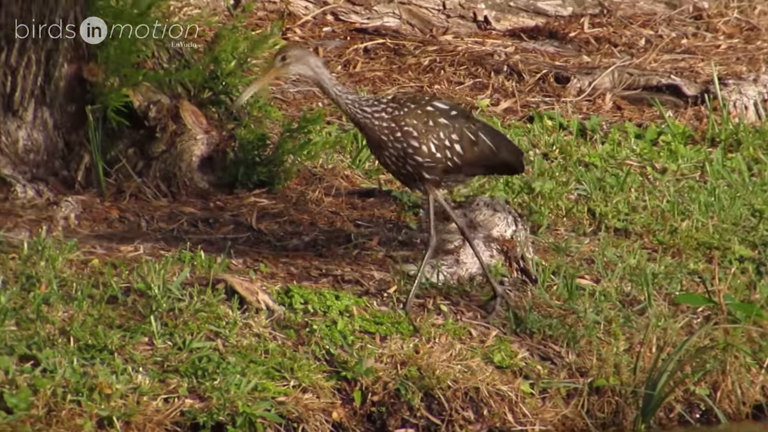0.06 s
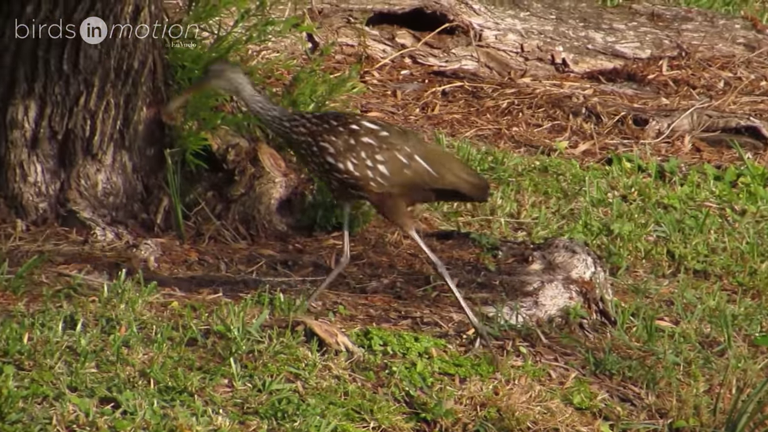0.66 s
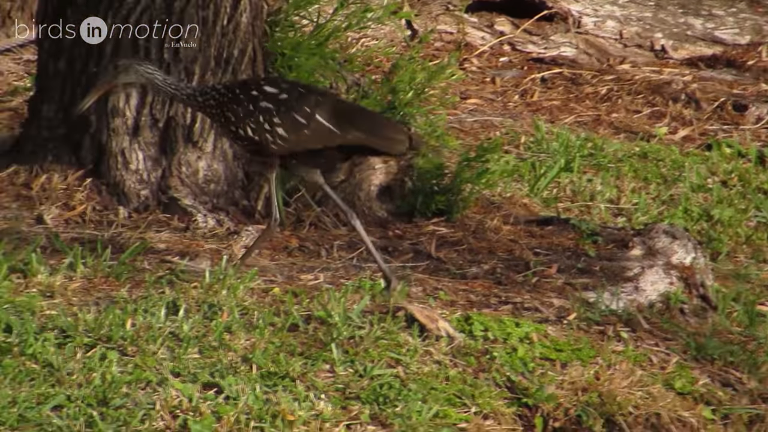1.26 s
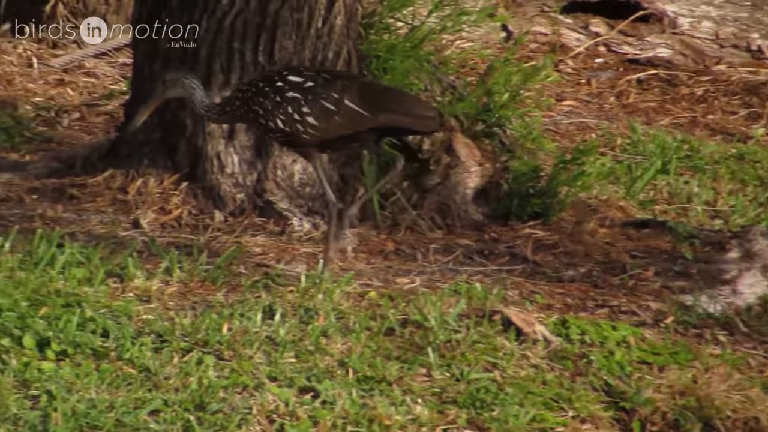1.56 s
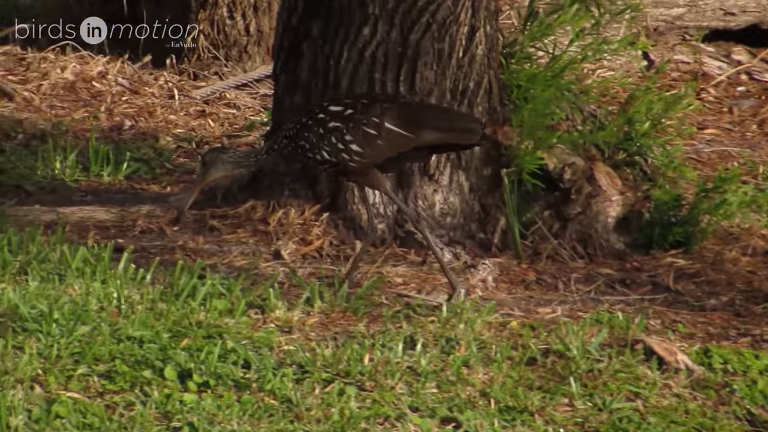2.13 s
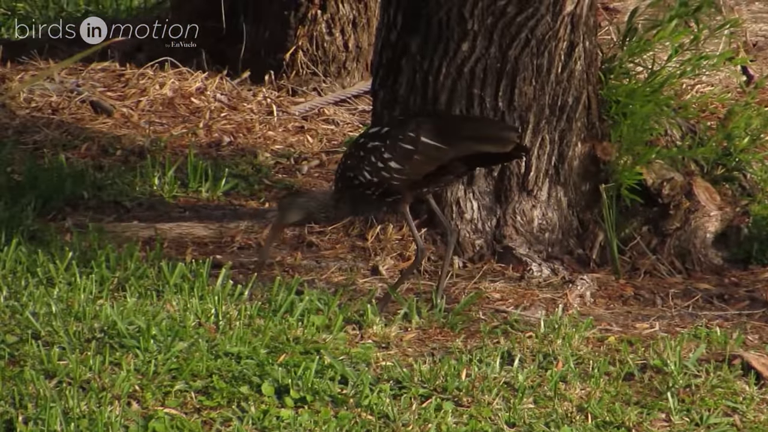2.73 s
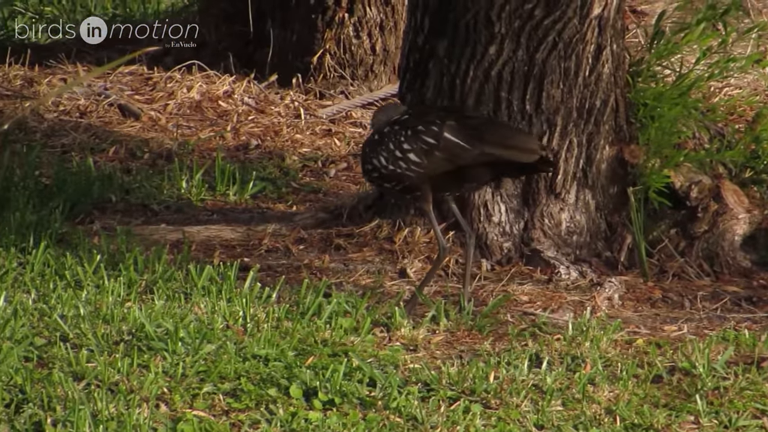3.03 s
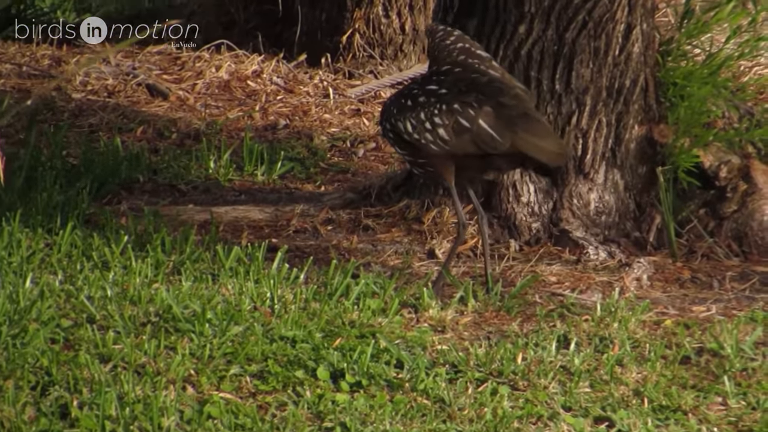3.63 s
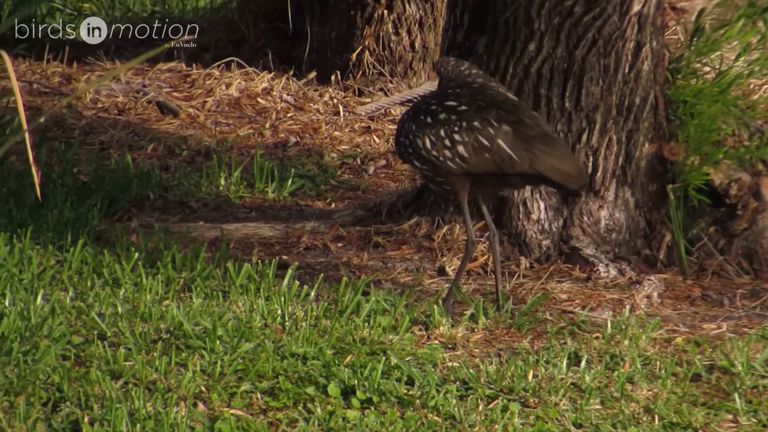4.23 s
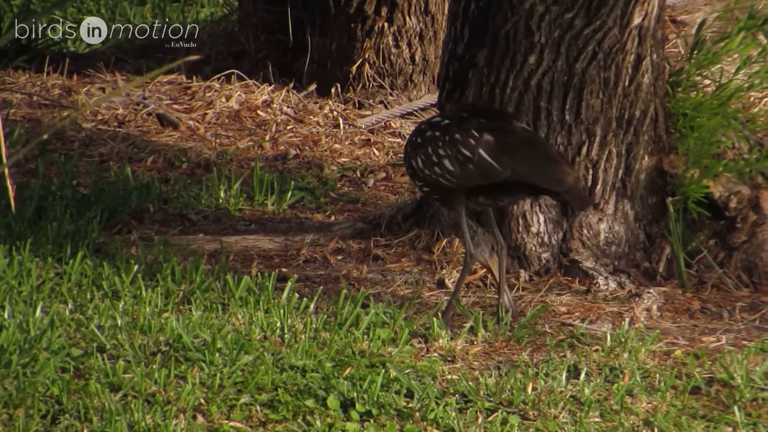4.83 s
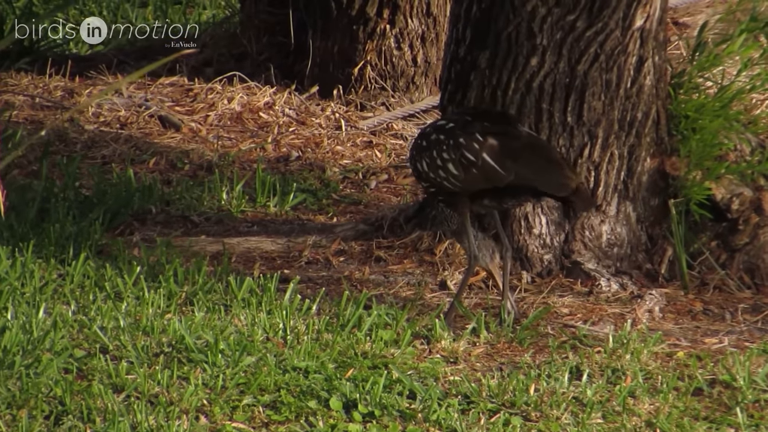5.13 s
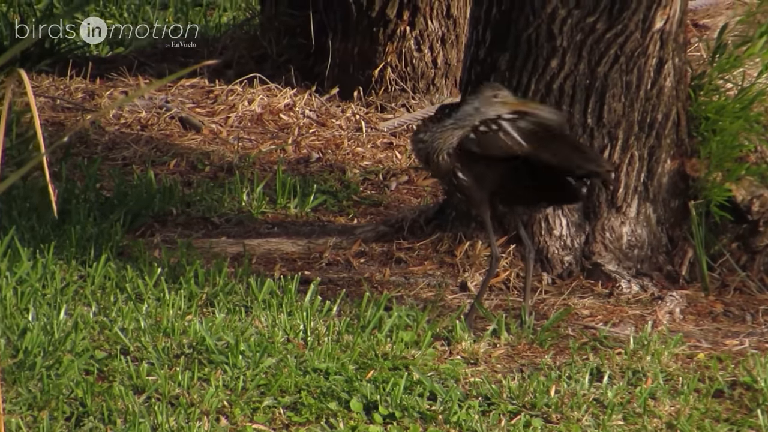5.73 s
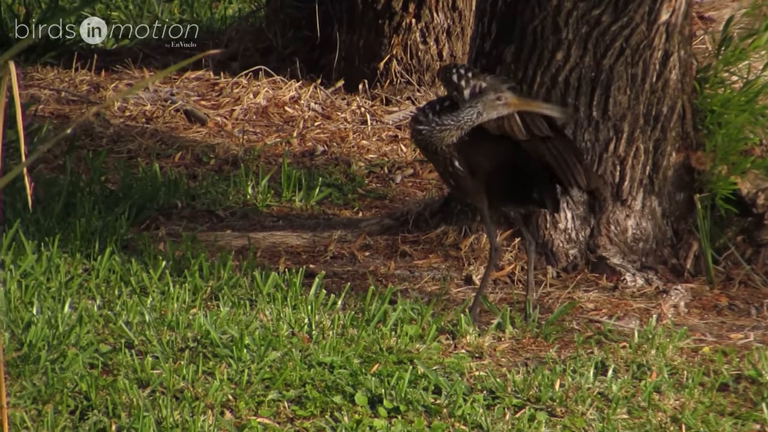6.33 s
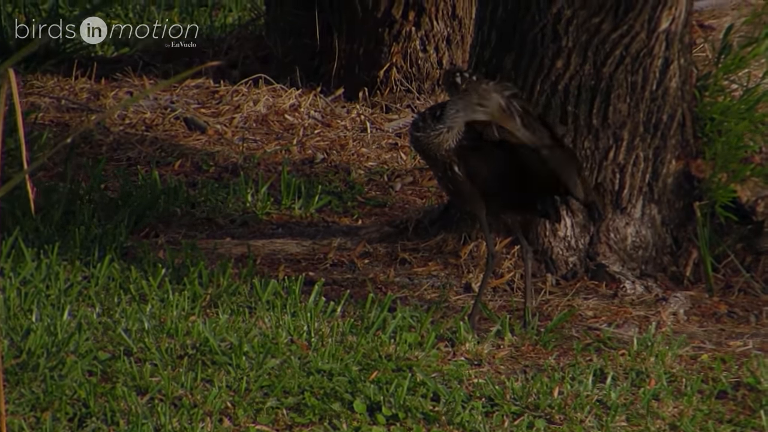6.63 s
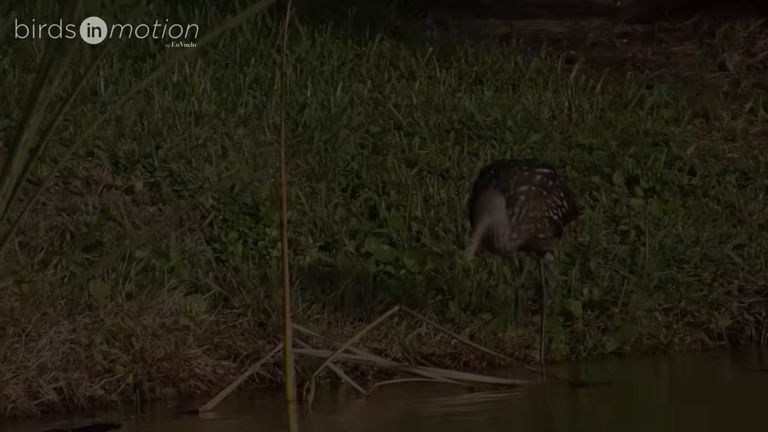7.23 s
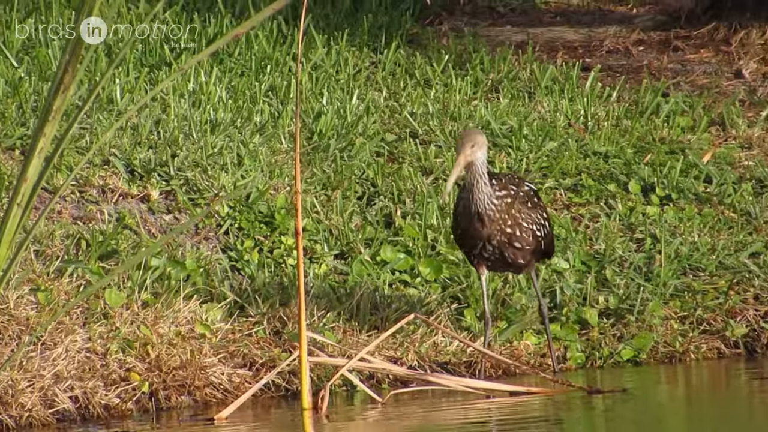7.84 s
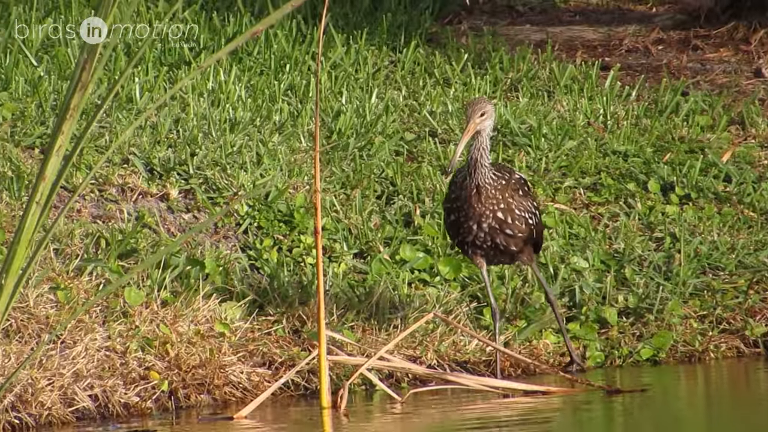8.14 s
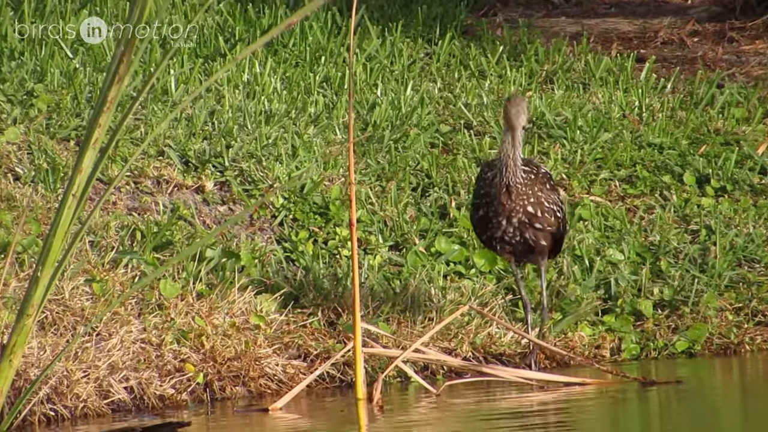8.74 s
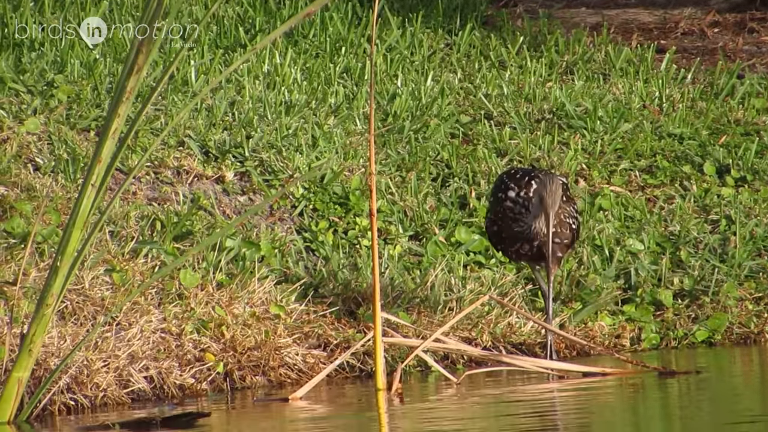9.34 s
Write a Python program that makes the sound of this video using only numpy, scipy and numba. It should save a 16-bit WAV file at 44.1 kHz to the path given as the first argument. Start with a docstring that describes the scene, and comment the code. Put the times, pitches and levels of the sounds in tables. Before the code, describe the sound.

Steady splashing water at a pond over distant traffic, with wind gusts buffeting the microphone, then calmer air and a faint engine hum.

```python
"""Splashing water at a pond, likely a fountain: countless drops merge into hiss, small bubbles plink. Distant
traffic rumbles underneath. Gusts throw eddies at a stereo microphone; its gain control ducks on the hardest and
creeps back up. Near 7 s the sound falls silent for a moment and the scene changes to calm air, where a far
engine hums and fades."""
import sys
import numpy as np
from scipy import signal
from scipy.fft import rfft, irfft
from scipy.io import wavfile
from scipy.ndimage import uniform_filter1d, minimum_filter1d
from numba import njit

SR = 44100
rng = np.random.default_rng(int(sys.argv[2]) if len(sys.argv) > 2 else 0)


def transcribe(u):
    """Save the signal u as a 16-bit wav file named by the first command-line argument.

    u: samples, shape (n,) or (channels, n), limited to [-1, 1]; the rate is SR.
    q: integer samples, one column per channel.
    """
    v = np.clip(np.atleast_2d(u).T, -1, 1)
    q = np.round(v * 32767).astype(np.int16)
    wavfile.write(sys.argv[1], SR, q)


N = 418068
TIME_S, FREQ_HZ = np.arange(N) / SR, np.arange(N // 2 + 1) * SR / N

# splash spectrum, common to both channels: f/Hz, relative level/dB
SPLASH_MID_SPECTRUM = [(260, -27), (450, -16.5), (593, -9), (793, -5.5), (1190, -7), (1820, 0),
                       (2850, -6.5), (3650, -5), (3980, -10.5), (4400, -10.5), (6430, -16.5), (8110, -14.5),
                       (11700, -23), (13200, -26), (14500, -43)]
# splash spectrum, opposed between channels: f/Hz, relative level/dB
SPLASH_SIDE_SPECTRUM = [(260, -42.5), (450, -8.5), (1570, -5.5), (2770, -4.5), (3980, -10.5), (5640, -10.5),
                        (7430, -11), (7990, -13.5), (11000, -11.5), (12900, -14), (14500, -26)]
# narrow peaks and dips in the hiss: f/Hz, width/Hz, gain/dB
SPLASH_BANDS = [(792, 22, 6.5), (2840, 100, -5.5), (3035, 96, 3), (4920, 730, -2), (5365, 240, 7),
                (5800, 250, -1.5), (6450, 740, 4.5), (7180, 410, -3), (7600, 140, 4), (8420, 830, -6.5)]
# splash balance: f/Hz, left minus right/dB
SPLASH_BALANCE = [(1200, 2), (2400, -1), (4400, -1.1), (8000, -2), (14000, -0.5)]
# fine spray above 4 kHz: t/s, gain/dB
FINE_SPRAY_GAIN = [(0, -0.5), (6.9, 0), (7.2, 0.65), (9.48, 2)]
# distant road spectrum: f/Hz, relative level/dB
TRAFFIC_SPECTRUM = [(20, -14), (45, -4.5), (100, -4), (180, -1), (240, -1), (330, -8), (480, -14),
                    (700, -30), (1200, -56)]
# drone of heavy engines: t/s, level/dB
DRONE_LEVEL = [(0, -51), (6.9, -59), (7.2, -48), (8.2, -45), (9.48, -41)]
# single plops and ticks: t/s, peak/dB, f/Hz, length/ms, left minus right/dB
WATER_TICKS = [(0.151, -18.5, 2890, 0.55, -9), (0.195, -22, 1950, 1.7, 0), (1.859, -14.5, 3830, 0.17, -9),
               (3.232, -21, 1650, 1.6, 5), (6.0327, -12, 2630, 0.36, 4), (6.316, -19.5, 5700, 0.34, -11),
               (8.174, -21, 1490, 1.2, 11), (8.334, -19, 2500, 0.8, -1), (8.5695, -20, 2100, 1.1, -3),
               (8.85, -23, 2200, 1.1, -1), (8.992, -16, 5140, 0.25, -1)]
# breeze between gusts: t/s, level/dB
BREEZE_LEVEL = [(0, -39), (0.45, -40), (0.7, -30.5), (0.92, -37.5), (1.1, -29), (1.38, -35), (1.45, -19.5),
                (1.7, -24), (1.95, -34), (2.15, -24), (2.48, -34), (2.7, -19.5), (3.05, -13.5), (3.35, -25),
                (3.75, -23), (4.7, -20.5), (5.2, -33.5), (5.9, -31), (6.35, -29), (6.95, -25)]
# gusts: start/s, hold/s, level/dB
WIND_GUSTS = [(1.191, 0.025, -17.5), (1.51, 0.013, -12), (1.66, 0.013, -23), (2.227, 0.033, -8.5),
              (2.308, 0.093, -16.5), (2.561, 0.11, -13), (2.637, 0.096, -8.5), (2.754, 0.067, -9.5),
              (2.834, 0.1, -9.5), (2.938, 0.054, -6), (3.047, 0.092, -8), (3.14, 0.061, -8),
              (3.244, 0.074, -15.5), (3.418, 0.083, -4.5), (3.52, 0.093, -3.5), (3.646, .055, -6.5),
              (3.788, 0.058, -11.5), (3.917, 0.011, -9), (3.943, 0.072, -9.5), (4.072, 0.058, -1),
              (4.143, 0.057, 1.5), (4.193, 0.1, 5.5), (4.269, 0.035, 6), (4.335, 0.02, -0.5),
              (4.408, 0.092, -2), (4.478, 0.087, -0.5), (4.59, 0.037, 0), (4.848, 0.023, -21),
              (5.375, 0.035, -16), (5.467, 0.033, -18), (5.635, .03, -21), (5.973, 0.027, -16),
              (6.04, 0.069, -24), (6.364, 0.017, -19), (6.422, 0.012, -24.5), (6.48, 0.1, -16.5),
              (6.64, 0.038, -25), (6.769, .035, -15.5), (6.865, 0.041, -17.5)]
# largest eddies, heard as thumps: t/s, level/dB, length/ms
BIG_EDDIES = [(1.009, -13.5, 6), (1.046, -19, 7.4), (1.126, -9, 3.2), (1.173, -12, 4.6), (1.207, -4.5, 3.8),
              (1.223, -11, 1.8), (1.264, -10.5, 3.2), (1.409, -10, 2.05), (1.518, -6, 1.8),
              (1.523, 12.5, 0.87), (2.117, -14, 6), (2.232, 4, 3.9), (2.244, 6, 1.7), (2.251, 1, 1.4),
              (2.263, -2, 3.1), (2.317, -2, 2.5), (2.34, -6, 1.4), (2.387, -2.5, 2.5), (2.657, 6, 0.93),
              (2.67, -1, 1.2), (2.710, 5.5, 0.63), (2.733, 0, 0.9), (2.768, -11, 1.7), (2.787, 1.5, 4.5),
              (2.812, 5.5, 2.45), (2.85, 8, 1.55), (2.863, -5, 0.95), (2.887, 9, 1.23), (2.902, 9.5, 1.17),
              (2.91, 7, 0.83), (2.957, 10, 1.3), (2.987, 7, 3.3), (3.085, 1, 2), (3.115, 7.5, 2.7),
              (3.147, 4, 1.95), (3.174, 2, 1.9), (3.214, 3, 1.33), (3.429, 6.5, 1.4), (3.457, 7.5, 0.92),
              (3.486, 6.5, 1.4), (3.516, -1, 3.1), (3.535, 10.5, 1.07), (3.558, 10.5, 1.74),
              (3.612, 1, 0.87), (3.688, 6, 1.45), (3.838, 4, 2.24), (3.924, 8, 1.76), (4.08, 9, 2.2),
              (4.101, 4, 2.4), (4.134, 11, 1.8), (4.144, 13.5, 0.89), (4.164, 10, 1.7), (4.179, 12.5, 1.6),
              (4.2, 15.5, 0.42), (4.209, 17.5, 0.61), (4.223, 16, 1.45), (4.23, 15, 0.7),
              (4.243, 16.5, 1.3), (4.274, 18, 0.65), (4.352, 7, 0.55), (4.361, 17, 0.78), (4.436, 10, 1.02),
              (4.48, 7, 0.81), (4.509, 4.5, 1), (4.531, 9, 0.57), (4.565, 12, 0.93), (4.596, 13, 0.65),
              (4.629, 4, 1.04), (5.005, -10, 1.46), (5.098, -3, 1.33), (5.396, -7, 5.2), (5.421, -6, 1.4),
              (5.726, -5, 3.3), (5.737, -6, 0.78), (5.749, -3, 2.2), (5.988, -11, 2.5), (6.19, -9, 1.8),
              (6.237, -8, 1.9), (6.286, -9.5, 1.55), (6.371, -12, 3.2), (6.428, -6.5, 1.55),
              (6.501, -8.5, 1.3), (6.535, 1, 1.13), (6.549, -7, 0.91), (6.576, -9, 1.1), (6.65, -13, 2.9),
              (6.7, -3.5, 1.63), (6.764, 1, 1.25), (6.8, -8, 1.2), (6.817, 3.5, 1.4), (6.895, 4.5, 0.95),
              (6.912, -6, 1.7)]
# far engine tones: f/Hz, level/dB
ENGINE_TONES = [(129, -49), (151, -47.5), (241, -53.5), (426, -55)]
# the camera's two deep notches: f/Hz, width/Hz, gain/dB
NOTCH_BANDS = [(3945, 130, -17), (7880, 90, -24)]

SILENCE_S, RESUME_S = 6.972, 7.137


def undb(db):
    """Decibels to gain."""
    return 10 ** (np.asarray(db) / 20)


def level(x, db):
    """Set the rms level."""
    return x * undb(db) / np.sqrt(np.mean(x ** 2))


def envelope(points):
    """Gain curve through (t/s, level/dB) points."""
    return undb(np.interp(TIME_S, *np.transpose(points)))


def shape(x, points):
    """Filter through (f/Hz, gain/dB) points."""
    hz, db = np.transpose(points)
    return irfft(rfft(x) * undb(np.interp(np.log(FREQ_HZ + 1), np.log(hz), db)), N)


def bells(x, bands):
    """Boost or cut narrow bands: f/Hz, width/Hz, gain/dB."""
    gain_db = sum(db / (1 + (2 * (FREQ_HZ - hz) / width_hz) ** 2) for hz, width_hz, db in bands)
    return irfft(rfft(x) * undb(gain_db), N)


def drift(rate_hz):
    """Random steps, smoothed twice; unit rms."""
    hold = int(SR / rate_hz)
    steps = rng.standard_normal(2048)[np.arange(N) // hold]
    return level(uniform_filter1d(uniform_filter1d(steps, hold), hold), 0)


def stereo(mid, side, pan_db):
    """Mid and side to left and right."""
    return np.array([mid + side, mid - side]) * undb([[pan_db / 2], [-pan_db / 2]])


def spray(drops_per_s=4000, spread_db=2, flicker_db=0.5):
    """Countless drops merge into hiss; near ones add grain."""
    sizes = undb(np.minimum(spread_db * rng.exponential(size=N), 6)) * rng.choice([-1, 1], N)
    drops = sizes * (rng.random(N) < drops_per_s / SR)
    grain = level(shape(drops, [(3500, 0), (12000, -7)]), db=-6)
    return (rng.standard_normal(N) + grain) * undb(flicker_db * drift(rate_hz=18))


def fountain(mid_db=-34, side_db=-38):
    """Falling water: centred in the midrange, wide in the treble."""
    mid = level(bells(shape(spray(), SPLASH_MID_SPECTRUM), SPLASH_BANDS), mid_db)
    side = level(shape(spray(), SPLASH_SIDE_SPECTRUM), side_db)
    left = shape(mid + side, [(hz, db / 2) for hz, db in SPLASH_BALANCE])
    right = shape(mid - side, [(hz, -db / 2) for hz, db in SPLASH_BALANCE])
    water = np.array([left, right])
    fine_spray = shape(water, [(2000, -30), (4000, 0)])
    return water + fine_spray * (envelope(FINE_SPRAY_GAIN) - 1)


def traffic(rumble_db=-40, side_gain_db=-11, calm_gain_db=-1.4, swell_db=0.07, drone_hz=108):
    """Far road: low rumble near the centre, plus a narrow drone of heavy engines."""
    mid, side = (level(shape(rng.standard_normal(N), TRAFFIC_SPECTRUM), rumble_db) for _ in range(2))
    band = signal.iirpeak(drone_hz, Q=drone_hz / 75, fs=SR)
    drone = level(signal.lfilter(*band, signal.lfilter(*band, rng.standard_normal(N))), 0)
    mid = mid * undb(calm_gain_db * (TIME_S > RESUME_S)) + drone * envelope(DRONE_LEVEL)
    return stereo(mid, undb(side_gain_db) * side, pan_db=2.5) * undb(-swell_db * drift(rate_hz=3.31))


def bubbles(low_hz=1300, high_hz=3800, base_db=-29, spread_db=2, count=520):
    """Small bubbles burst at random, high ones shorter; rows as in WATER_TICKS."""
    when, pitch, place = rng.random((count, 3)).T
    peak_db = base_db + spread_db * np.minimum(rng.exponential(size=count), 3)
    hz = low_hz * (high_hz / low_hz) ** pitch
    length_ms = 0.56 * high_hz / (hz + low_hz)
    pan_db = 10 * (place - 0.5)
    return list(zip(when * N / SR, peak_db, hz, length_ms, pan_db))


def ticks(samples=512):
    """Each plop or bubble rings for a few cycles."""
    out, age_s = np.zeros((2, N + samples)), np.arange(samples) / SR
    for start_s, peak_db, hz, length_ms, pan_db in list(WATER_TICKS) + bubbles():
        ring = np.sin(2 * np.pi * hz * age_s) * age_s * np.exp(-2 * age_s * 1000 / length_ms)
        at = int(start_s * SR)
        out[:, at:at + samples] += stereo(undb(peak_db) * ring / np.abs(ring).max(), 0, pan_db)
    return out[:, :N]


def wind_force_db(rise_db_s=1108.5, fall_db_s=385, flutter_db=2, flutter_hz=40):
    """Gusts rise fast, hold and sink into the breeze; the whole flow flutters."""
    power = envelope(BREEZE_LEVEL) ** 2
    for start_s, hold_s, db in WIND_GUSTS:
        below_db = np.maximum((start_s - TIME_S) * rise_db_s, (TIME_S - start_s - hold_s) * fall_db_s)
        power += undb(db - np.clip(below_db, 0, 100)) ** 2
    return 10 * np.log10(power) + flutter_db * drift(flutter_hz)


def eddies(times_s, sizes, lengths_ms, half_span=200, decimation=4):
    """Each vortex is a pressure spike between shallow troughs; dull enough for a coarse grid."""
    lag, window = np.arange(-half_span, half_span), np.hanning(2 * half_span)
    distance_sq = (lag * decimation * 1000 / SR / lengths_ms[:, None]) ** 2
    pulses = sizes[:, None] * (1 - distance_sq) / (1 + distance_sq / 3) ** 4 * window
    pulses -= pulses.sum(axis=1, keepdims=True) * window / half_span  # no net pressure
    at = (times_s[:, None] * SR / decimation).astype(int) + lag
    pressure = np.bincount(np.abs(at).ravel(), pulses.ravel(), N // decimation)
    return signal.resample_poly(pressure, decimation, 1)


def turbulence(force_db, eddy_ms=1.25, halving_db=24, breakup_s=0.012, crest=3.3, count=12000):
    """Eddy shower up to the silence; faster wind makes eddies louder, shorter and more frequent."""
    times_s = rng.uniform(0, SILENCE_S, count)
    push, scatter = rng.standard_normal((count, 2)).T
    # large eddies lead each gust, then break up
    typical_ms = eddy_ms * 2 ** (-np.interp(times_s - breakup_s, TIME_S, force_db) / halving_db)
    passing = rng.random(count) < 0.85 / typical_ms
    stretch = np.exp(0.3 * scatter)
    sizes = push * np.sqrt(stretch)  # small eddies are weak
    flow = eddies(times_s[passing], sizes[passing], (typical_ms * stretch)[passing])
    flow *= undb(1.5 * drift(rate_hz=110))
    flow /= np.sqrt(np.abs(uniform_filter1d(flow ** 2, size=2200)) + 1e-6)  # force alone sets the level
    return crest * np.tanh(flow / crest) * undb(force_db)


def buffets(partner_db=-8, spacing=4.45, stretch=1.05, scatter=0.19):
    """Hardest eddies, each with a weaker, wider partner a few lengths ahead or behind."""
    times_s, db, lengths_ms = np.transpose(BIG_EDDIES)
    push, order, gap = rng.standard_normal((len(times_s), 3)).T
    sizes = undb(db) * np.sign(push)
    offset_s = np.sign(order) * spacing * np.exp(scatter * gap) * lengths_ms / 1000
    partners = (times_s + offset_s, sizes * undb(partner_db), lengths_ms * stretch)
    return np.hstack([(times_s, sizes, lengths_ms), partners])


def wind(side_gain_db=0.8, mid_gain_db=-15, mid_buffet_db=-14.5, sweep_s=0.003, low_cut_hz=32):
    """Wind on the microphone pushes the channels in opposition, with little in common."""
    times_s, sizes, lengths_ms = buffets()
    force_db = wind_force_db()
    # a big vortex sweeps small ones aside
    coarse_s = TIME_S[::8]
    nearest_s = np.abs(coarse_s[:, None] - np.transpose(BIG_EDDIES)[0]).min(axis=1)
    unswept = np.interp(TIME_S, coarse_s, 1 - np.exp(-(nearest_s / sweep_s) ** 2))
    side = undb(side_gain_db) * turbulence(force_db) * unswept + eddies(times_s, sizes, lengths_ms)
    late_push = eddies(times_s + lengths_ms / 1000, sizes, lengths_ms)
    mid = undb(mid_gain_db) * turbulence(force_db) + undb(mid_buffet_db) * late_push
    low_cut = signal.butter(2, low_cut_hz, "high", fs=SR, output="sos")
    return signal.sosfilt(low_cut, stereo(mid, side, pan_db=-1.4))


def engine(wander=0.00594, wander_hz=5, waver_db=2, fade_start_s=7.7, fade_db_s=10):
    """Far engine: wavering tones hold after the silence, then fade into the traffic."""
    clock_s = np.cumsum(1 + wander * drift(wander_hz)) / SR
    tones = np.zeros(N)
    for hz, db in ENGINE_TONES:
        amplitude = np.sqrt(2) * undb(db + waver_db * drift(wander_hz))
        tones += amplitude * np.sin(2 * np.pi * hz * clock_s)
    fade = undb(-fade_db_s * np.maximum(TIME_S - fade_start_s, 0))
    return stereo(tones * fade * (TIME_S > SILENCE_S), 0, pan_db=1)


def scene():
    """Water, road, wind and engine, in stereo."""
    return fountain() + traffic() + ticks() + wind() + engine()


@njit
def gain_cut_db(over_db, attack_s, fast_db_s, slow_db_s, memory_s):
    """Fast attack; quick release down to a slow memory of long overloads."""
    out, cut_db, held_db = np.empty(len(over_db)), 0., 0.
    for i in range(len(over_db)):
        if over_db[i] > cut_db:
            cut_db += (over_db[i] - cut_db) / (1 + attack_s * SR)
        else:
            cut_db = max(cut_db - fast_db_s / SR, held_db)
        if cut_db > held_db:
            held_db += (cut_db - held_db) / (memory_s * SR)
        else:
            held_db = max(held_db - slow_db_s / SR, 0.)
        out[i] = cut_db
    return out


def gain_control(x, ceiling_db=-3):
    """Both channels duck on peaks over the ceiling; sharp fronts slip through and clip."""
    peak_db = 20 * np.log10(np.abs(x).max(axis=0) + 1e-9)
    headroom_db = minimum_filter1d(ceiling_db - peak_db, size=61)
    cut_db = gain_cut_db(-headroom_db, attack_s=0.00071, fast_db_s=13., slow_db_s=5., memory_s=0.88)
    return np.clip(x * uniform_filter1d(undb(-cut_db), size=41), -1, 1)


def record(dry, top_hz=14500):
    """Notches, gain control that starts afresh after the silence between scenes, steep low-pass."""
    x = bells(dry, NOTCH_BANDS)
    stop, resume = int(SILENCE_S * SR), int(RESUME_S * SR)
    silence = np.zeros((2, resume - stop))
    x = np.hstack([gain_control(x[:, :stop]), silence, gain_control(x[:, resume:])])
    return signal.sosfilt(signal.ellip(8, 0.2, 70, top_hz, fs=SR, output="sos"), x)


dry = scene()
out = record(dry)
transcribe(out)
```